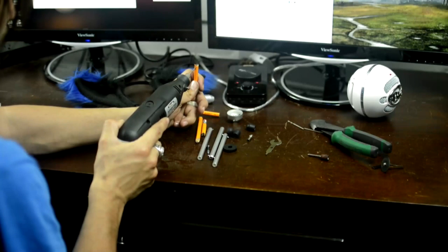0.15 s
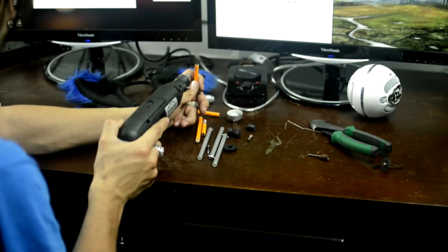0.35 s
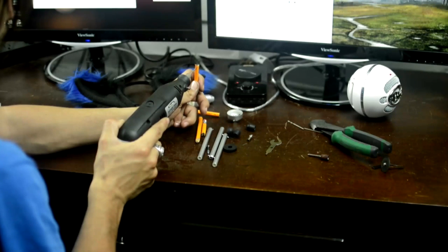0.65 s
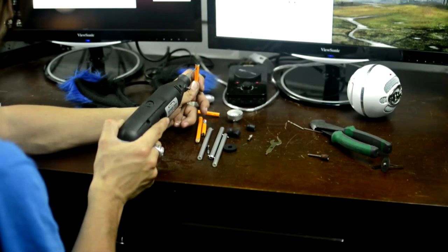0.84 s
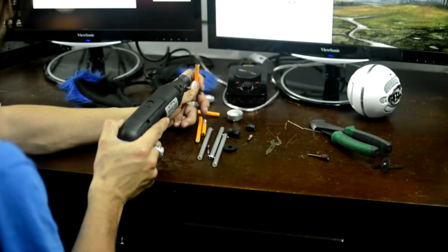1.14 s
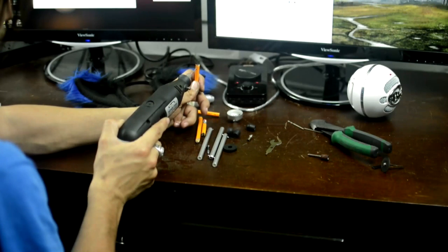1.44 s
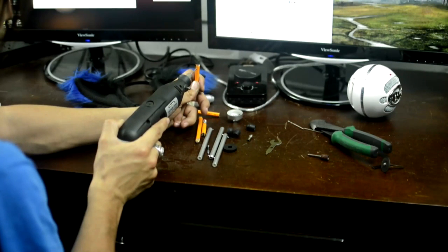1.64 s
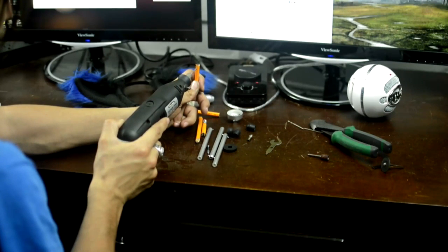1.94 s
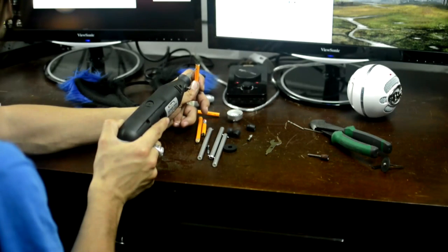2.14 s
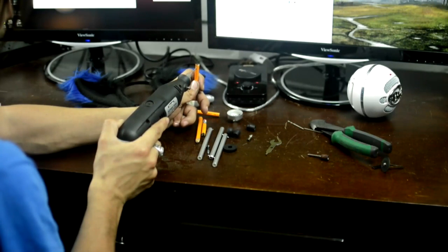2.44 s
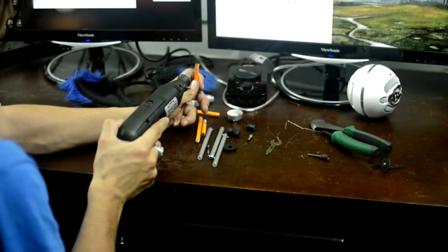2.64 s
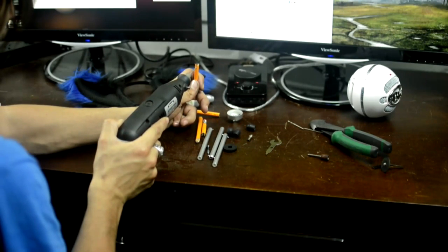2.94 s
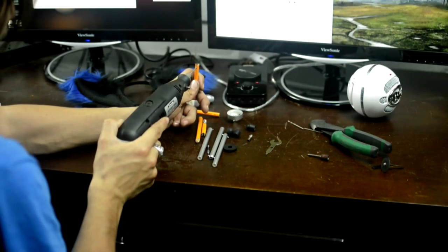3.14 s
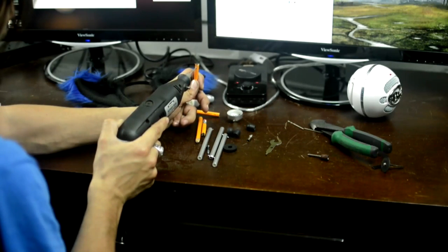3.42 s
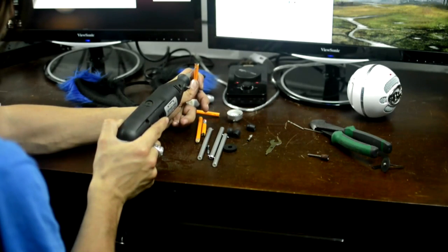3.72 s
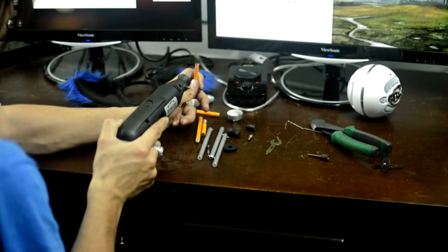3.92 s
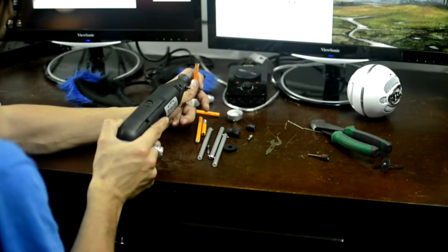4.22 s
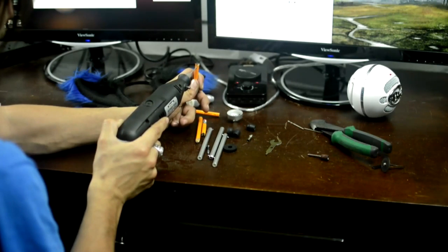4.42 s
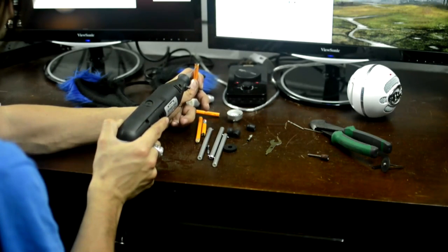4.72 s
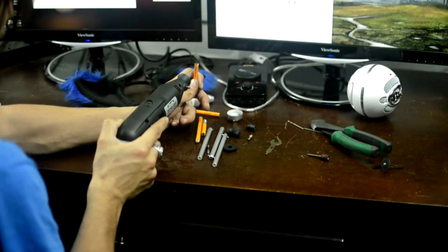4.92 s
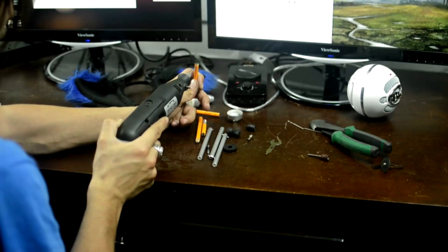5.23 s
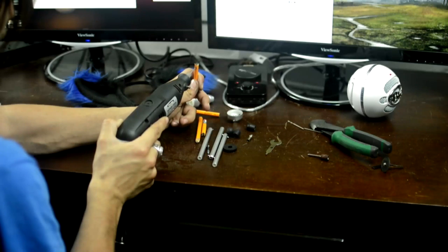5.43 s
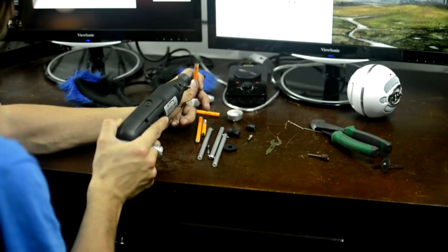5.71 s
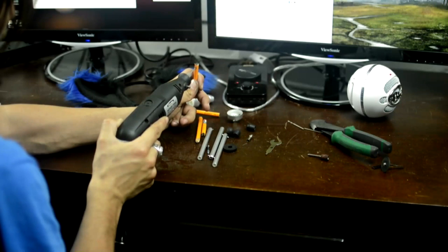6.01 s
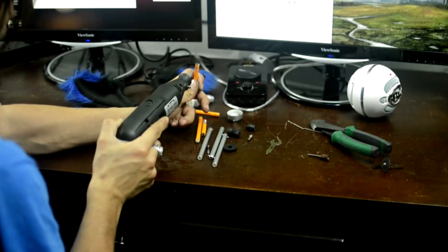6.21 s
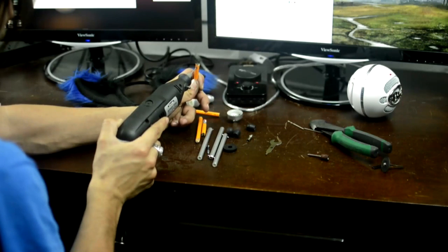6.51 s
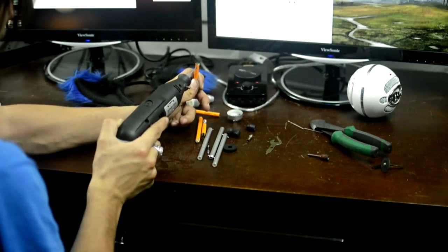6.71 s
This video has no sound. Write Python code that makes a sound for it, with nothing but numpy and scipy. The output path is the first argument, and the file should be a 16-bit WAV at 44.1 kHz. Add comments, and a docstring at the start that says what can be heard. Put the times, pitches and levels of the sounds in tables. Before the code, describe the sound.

A small electric rotary tool winds up to a buzzy whine and drills wood, its pitch slowly sagging amid hiss, rasp and brief squeals.

```python
"""At a desk in a quiet room, two close microphones hear a small rotary tool drill hand-held wood.
The motor winds up and whines on multiples of its shaft speed, which sags under load.
Each leading tone swells or fades as it glides through standing waves; brushes and fan hiss in the housing.
The bit rasps twice a turn, sings briefly on single overtones and chatters where it grabs."""
import sys
import numpy as np
from scipy import signal
from scipy.fft import rfft, irfft
from scipy.io import wavfile
from scipy.ndimage import uniform_filter1d

SR = 44100
rng = np.random.default_rng(int(sys.argv[2]) if len(sys.argv) > 2 else 0)


def store_wav(level_fs):
    """Save 16-bit WAV to argv[1]."""
    pcm = np.round(np.clip(np.atleast_2d(level_fs), -1, 1) * 32767)
    wavfile.write(sys.argv[1], SR, pcm.T.astype(np.int16))


N = 302526
TIME = np.arange(N) / SR
FREQS = np.fft.rfftfreq(N, 1 / SR)


def amp(db):
    """Decibels to gain."""
    return 10 ** (np.asarray(db) / 20)


def unit(x):
    """Scales to rms 1."""
    return x / np.sqrt(np.mean(x ** 2) + 1e-20)


def curve(rows):
    """Joins (time, value) rows by straight lines."""
    return np.interp(TIME, *np.transpose(rows))


def read(points, hz):
    """Reads (frequency, value) points on a log-frequency axis."""
    f, value = np.transpose(points)
    return np.interp(np.log(hz + 1), np.log(f + 1), value)


def colour(x, db):
    """Filters by a dB value for every frequency; rms 1."""
    return unit(irfft(rfft(x) * amp(db), N))


def wander(rate_hz):
    """Slow random drift of rms 1: noise that rolls off above rate_hz."""
    t = np.linspace(0, N / SR, 8192)
    rolloff = 1 + (np.fft.rfftfreq(len(t), t[1]) / rate_hz) ** 4
    slow = irfft(rfft(rng.standard_normal(len(t))) / rolloff)
    return np.interp(TIME, t, unit(slow))


def swell(start_s, length_s):
    """A bell-shaped rise and fall centred on start_s, length_s wide at half height."""
    return .5 ** ((2 * (TIME - start_s) / length_s) ** 2)


def sine(turns):
    """A sine of rms 1 with a random starting phase."""
    return np.sqrt(2) * np.sin(2 * np.pi * (turns + rng.random()))


def strokes(turns, sharpness):
    """One smooth peak in every turn; rms 1."""
    return unit(np.exp(sharpness * np.cos(2 * np.pi * turns)))


def resonance_db(modes, hz):
    """The gain that a set of resonances adds at these frequencies."""
    return sum(db / (1 + (2 * (hz - centre) / width) ** 2) for centre, width, db in modes)


# colour of the quiet room: (frequency [Hz], relative level [dB])
ROOM_COLOUR = [(20, -16), (50, -1.5), (100, -0.5), (190, 2), (320, -9), (600, -16), (3000, -53)]


def room(level_db=-69, hum_db=-68.5, swell_db=2.6, swell_period_s=2.45, first_swell_s=0.29, waver_db=1.5):
    """Low room noise and a mains hum that slowly swells and wavers."""
    slow_db = swell_db * np.cos(2 * np.pi * (TIME - first_swell_s) / swell_period_s)
    hum = sine(120 * TIME) * amp(hum_db + slow_db + waver_db * wander(4))
    noise = colour(rng.standard_normal(N), read(ROOM_COLOUR, FREQS))
    return amp(level_db) * noise + hum


def walls(x, level_db=-13, t60_s=0.19, above_hz=1900):
    """Adds the room's diffuse treble tail, against which the high tones fade in and out."""
    tail = rng.standard_normal(N) * amp(-60 * np.minimum(TIME / t60_s, 2))
    treble = FREQS ** 8 / (FREQS ** 8 + above_hz ** 8)
    response = rfft(tail / np.linalg.norm(tail)) * treble
    return irfft(rfft(x) * (1 + amp(level_db) * response), N)


# standing waves between tool, desk and walls; nodes have negative gain:
# (frequency [Hz], width [Hz], gain [dB])
STANDING_WAVES = [(255.5, 14.4, 12), (275.7, 15.5, 13), (534.5, 12.5, 9.5), (541.5, 3.6, -4),
                  (548, 4.8, 6.0), (555, 7, -3.5), (575.9, 22, 16), (813.2, 28.5, 12.5), (862, 13.4, 9),
                  (1063, 6.6, 8), (1085, 10, 5), (1116, 6.0, 7), (1151.6, 35, 13.3), (1627, 32.6, 8.3),
                  (1667, 12, 13), (1706, 7.1, -7.5), (1727, 33, 13.0), (2153, 20, 7.5), (2175, 12, 9.5),
                  (2212.4, 18, 10.5), (2277, 58, 8.5), (4240, 22, 7), (4381, 100, 9), (4556, 32, 8),
                  (4628.8, 29, 9.5), (9779.3, 34, 4.4), (9892.5, 43, -1.5), (10360, 49.9, -3)]


def standing_wave_db(hz):
    """How far a tone is lifted or swallowed as it glides through the standing waves."""
    return resonance_db(STANDING_WAVES, hz)


# resonances of the plastic housing: (frequency [Hz], width [Hz], gain [dB])
HOUSING = [(663, 19, 8.5), (834, 75, 2.5), (988, 36, 6), (1354, 53, 5.5), (1496, 29, 8), (1666, 105, 3),
           (2000, 76, 2.5), (2160, 16, 4), (2340, 26, 3.5), (2440, 36, 6), (2820, 64, 3)]


def housing_db():
    """The gain that the shell's resonances add."""
    return resonance_db(HOUSING, FREQS)


# shaft speed: (time [s], speed [turns/s])
SHAFT_SPEED = [(0.0, 247.2), (0.17, 259.7), (0.44, 272.5), (0.77, 282.0), (1.04, 286.4), (1.25, 288.3),
               (1.48, 289.7), (2.01, 289.5), (2.94, 286.0), (3.47, 283.2), (4.15, 278.2), (4.33, 275.3),
               (4.91, 274.2), (5.25, 271.7), (5.92, 268.7), (6.49, 265.7), (6.78, 270.2), (6.85, 270.4)]


def shaft_speed():
    """The motor winds up, sags under load and wavers slightly."""
    return curve(SHAFT_SPEED) * (1 + 0.00043 * wander(17.8))


# how hard the bit cuts, before the grabs and the rasp's own trim: (time [s], level [dB])
CUT = [(0.0, -50.5), (0.57, -47.5), (1.11, -42.5), (1.78, -41.5), (2.86, -43.5), (3.2, -41), (3.42, -44),
       (3.57, -43), (3.92, -42.5), (4.32, -44.5), (4.93, -43.5), (5.39, -44.5), (6.85, -46)]


def cutting(grab_db=3):
    """How hard the bit cuts, in dB: the hand's feed, and a little more at each grab."""
    return curve(CUT) + grab_db * sum(swell(s, length) for s, length, _ in GRABS)


# colour of fan and brushes, before housing and ripple: (frequency [Hz], relative level [dB])
AIR_COLOUR = [(100, -21.5), (330, -16), (480, -13), (800, -7), (1300, -2.5), (2400, 2), (3400, -1.5),
              (5500, -4.5), (8000, -6.5), (10300, -7), (11400, -11.5), (12300, -10), (13200, -8),
              (15000, -17.5)]


def air(turns, speed, level_db=-39.5, speed_power=2.8, ripple_db=3.0):
    """Fan and brush hiss rises with speed and rings the housing; nearby echoes ripple its colour."""
    hiss = rng.standard_normal(N) * strokes(2 * turns, sharpness=0.11)
    ripple = unit(uniform_filter1d(rng.standard_normal(len(FREQS)), size=400))
    colour_db = read(AIR_COLOUR, FREQS) + housing_db() + ripple_db * ripple * (FREQS > 2800)
    return amp(level_db) * (speed / speed.max()) ** speed_power * colour(hiss, colour_db)


def rattle(turns, speed, level_db=-48.5, centre_hz=2300, width_hz=450, speed_power=3):
    """The bearing knocks unevenly with each turn of its cage, in a band of the shell's resonances."""
    cage_turns = turns * 3 / 7
    knocks = rng.standard_normal(N) * strokes(cage_turns, sharpness=0.48) * amp(2.4 * wander(15))
    band_db = -20 * np.log10(1 + (2 * (FREQS - centre_hz) / width_hz) ** 2)
    ringing = colour(knocks, band_db + 0.36 * housing_db())
    return amp(level_db) * (speed / speed.max()) ** speed_power * ringing


# colour of the cutting rasp, before the housing: (frequency [Hz], relative level [dB])
RASP_COLOUR = [(100, -34), (450, -18), (900, -11), (1600, -6.5), (2800, 2), (3500, -4), (5000, 4),
               (7000, 0), (9500, -12.5), (11500, -15), (15000, -15)]


def rasp(turns, cut_db, level_db=-3.0):
    """Each of the two flutes scrapes off a chip once a turn."""
    chips = rng.standard_normal(N) * strokes(2 * turns, sharpness=0.24)
    chips *= strokes(4 * turns, sharpness=.3)
    chips *= amp(0.34 * wander(100))  # slight random unevenness, in dB
    return amp(cut_db + level_db) * colour(chips, read(RASP_COLOUR, FREQS) + .5 * housing_db())


# the bit sings, before a common trim:
# (time [s], length [s], multiple of the shaft speed, rms level [dB])
SQUEALS = [(0.72, .06, 16, -43), (0.738, 0.072, 10, -43.5), (1.194, 0.08, 20, -49), (1.264, .13, 10, -45),
           (1.65, 0.2, 20, -47.5), (2.318, 0.061, 10, -43), (2.906, 0.048, 14, -42), (2.94, .05, 26, -44),
           (3.02, .04, 30, -42), (3.18, 0.07, 26, -43), (3.363, 0.18, 12, -41), (3.46, .025, 24, -40.5),
           (3.52, 0.095, 18, -51), (3.68, 0.28, 14, -40.5), (3.8, 0.063, 20, -42), (4.053, 0.12, 10, -46.5),
           (4.46, .25, 24, -48), (4.669, 0.087, 12, -42), (4.715, 0.095, 14, -40), (4.728, .06, 22, -37.5),
           (4.798, 0.093, 22, -42), (4.733, .14, 20, -42), (5.084, 0.26, 20, -42), (5.402, 0.29, 14, -46)]


def squeals(turns, level_db=-1, rough=0.17):
    """The bit locks on to one overtone for a moment."""
    tones = sum(amp(db) * swell(s, length) * sine(order * turns) for s, length, order, db in SQUEALS)
    return amp(level_db) * tones * (1 + rough * wander(64))


# the bit grabs, level before the chatter's own modulation: (time [s], length [s], level [dB])
GRABS = [(3.003, 0.055, -40), (3.474, .05, -46), (3.655, 0.24, -54), (4.657, 0.065, -35),
         (6.844, 0.064, -34)]
# colour of the chatter: (frequency [Hz], relative level [dB])
CHATTER_COLOUR = [(400, -50), (1200, -20), (2200, -42), (3700, 5.5), (5000, -2.5), (6600, 2.5), (8800, 2.5),
                  (10500, -8), (15000, -21)]


def chatter(turns, slip=.012, noisy=0.79):
    """The grabbing bit hammers the hole twice a turn; the overtones of its blows flare at random."""
    blows = 2 * turns + slip * wander(83)
    ring = sum((.6 + wander(30)) * sine(k * blows) for k in range(3, 22))
    scrape = rng.standard_normal(N) * strokes(blows, sharpness=.4)
    grabs = sum(amp(db) * swell(s, length) for s, length, db in GRABS)
    return grabs * colour(unit(ring) + noisy * np.sqrt(2) * scrape, read(CHATTER_COLOUR, FREQS))


# the weaker even overtones: (frequency [Hz], level re the cut [dB])
EVEN = [(2700, -9.5), (3400, -10), (4000, -11), (5100, -11.5), (5700, -11), (6300, -13), (7200, -11.5),
        (7900, -29.5), (8700, -14.5), (10700, -17.5), (11500, -24), (14500, -38)]
# odd overtones from the shaft's runout: (frequency [Hz], level re the cut [dB])
ODD = [(1400, -23.5), (2000, -14), (3100, -11), (5400, -24.5), (7500, -28), (14000, -47)]


def buzz(turns, speed, cut_db, drift=0.53, rough=0.38, cage_depth=0.27, bite=0.12):
    """The other overtones grow with the cut, faster than the rasp; each drifts, and the bearing cage shakes them."""
    out, cage_turns = np.zeros(N), turns * 3 / 7
    for order in range(1, 54):
        if order in TONES or order == WHISTLE_ORDER:
            continue
        # levels are read on every 64th sample and held
        level_db = read(ODD if order % 2 else EVEN, order * speed[::64])
        level = np.repeat(amp(level_db), 64)[:N]
        size = 1 + drift * wander(5.2) + rough * wander(22.5) + cage_depth * sine(cage_turns)
        out += level * unit(size) * sine(order * turns)
    return out * amp(cut_db + bite * (cut_db - np.median(cut_db)))


WHISTLE_ORDER = 36  # multiple of the shaft speed
# nearby surfaces echo the whistle: (delay [ms], gain [ratio])
WHISTLE_ECHOES = [(8.49, .62), (13.095, .33)]


def whistle(turns, speed, level_db=-46.5, speed_power=6, flutter=0.13):
    """The commutator's tone beats against its own echoes: fast while the speed glides, slowly while it holds."""
    level = amp(level_db + standing_wave_db(WHISTLE_ORDER * speed)) * (speed / speed.max()) ** speed_power
    tone = level * (1 + flutter * wander(31)) * sine(WHISTLE_ORDER * turns)
    echoes = sum(gain * np.exp(-2j * np.pi * FREQS * ms / 1000) for ms, gain in WHISTLE_ECHOES)
    return irfft(rfft(tone) * (1 + echoes), N)


# leading tones, before standing waves and flutter:
# multiple of the shaft speed -> (level at the usual cut [dB], gain per dB of cut [dB])
TONES = {1: (-80, -0.47), 2: (-52.5, -0.19), 3: (-63.5, 1.0), 4: (-57.5, 0.72), 6: (-53.2, 1.1),
         8: (-53, .2), 16: (-54.5, .2)}
# the bit rubs the side of its hole and the sixth overtone howls: (time [s], length [s], gain [dB])
HOWLS = [(1.21, 0.096, 4.5), (1.468, 0.16, 12.5), (1.69, 0.14, 9), (1.95, .08, 3), (2.387, 0.088, 5),
         (2.93, .08, 3), (3.15, .12, 3), (3.6, 0.1, 2), (4.06, .16, 4), (4.22, .08, 4)]
# the bit skips in its hole, and the sixth overtone breaks off and restarts: (time [s])
SKIPS = [1.095, 1.21, 1.395, 1.46, 1.525, 1.885, 2.005, 2.16]


def whine(turns, speed, cut_db, flutter=0.062, phase_drift=0.0074, skip_s=0.016):
    """Leading motor tones follow the cut and the standing waves they pass; the higher ones flutter more."""
    out, load_db = np.zeros(N), cut_db - np.median(cut_db)
    for order, (db, gain_with_load) in TONES.items():
        level_db = db + gain_with_load * load_db + standing_wave_db(order * speed)
        shake = 1 + flutter * np.log2(order) ** 2 / 4 * wander(23) + 0.054 * wander(16)
        if order == 6:
            level_db += sum(howl_db * swell(s, length) for s, length, howl_db in HOWLS)
            # each skip passes through silence and returns with the sign flipped
            shake *= np.prod([np.tanh((TIME - s) / skip_s) for s in SKIPS], axis=0)
        out += amp(level_db) * shake * sine(order * turns + phase_drift * wander(5.2))
    return out


def main_spread(speed, node_db=-1, narrowing=1.18):
    """Side re mid of the main tone: the microphones agree on a standing wave's crest, less so near a node."""
    return amp(node_db - narrowing * standing_wave_db(2 * speed))


# what differs between the microphones, outside the main tone: (frequency [Hz], side re mid [dB])
WIDTH_DB = [(60, -15), (120, -12.5), (270, -16.5), (560, -20.5), (1200, -23.5), (2400, -15.5),
            (4400, -21.5), (8000, -13.5), (14000, -15)]
# balance of the two microphones: (frequency [Hz], left minus right [dB])
BALANCE_DB = [(60, 4), (120, 4), (270, -0.3), (560, -2), (1200, 0), (2400, 0.5), (5000, -0.5), (8000, 0.7),
              (13000, 2)]


def microphones(tones, noise, echo, spread, scatter=0.223, lag_rad=0.41):
    """Two close microphones: tones differ in phase, most in the treble; the noise's echoes are unrelated."""
    steps = rng.standard_normal(len(FREQS)) * np.minimum(FREQS / 8000, 1) ** 2
    shift = np.exp(1j * (np.pi / 2 + scatter * np.cumsum(steps)))
    # the band of the main tone, at twice the shaft speed, has its own place between the microphones
    main = 1 / (1 + ((FREQS - 540) / 90) ** 8)
    main_tone = irfft(main * rfft(tones), N)
    main_side = rfft(main_tone * spread) * np.exp(-1j * lag_rad)
    tone_side = shift * (1 - main) * rfft(tones)
    side = main_side + amp(read(WIDTH_DB, FREQS)) * (tone_side + rfft(echo))
    mid, lean = rfft(tones + noise), amp(read(BALANCE_DB, FREQS) / 2)
    return irfft(np.array([(mid + side) * lean, (mid - side) / lean]), N)


def scene():
    """One shaft drives every part of the tool."""
    speed = shaft_speed()
    turns, cut_db = np.cumsum(speed) / SR, cutting()

    def noises():
        """Room, hiss, bearing and rasp, drawn afresh at each call."""
        return room() + air(turns, speed) + rattle(turns, speed) + rasp(turns, cut_db)

    # the diffuse echo has the colour and level of the direct noise, but other fine detail
    noise, echo = noises(), noises()
    tones = walls(whine(turns, speed, cut_db) + whistle(turns, speed))
    tones += buzz(turns, speed, cut_db) + squeals(turns) + chatter(turns)
    return microphones(tones, noise, echo, main_spread(speed))


def record(dry, edge_hz=15050):
    """The recorder's band limit: a steep low-pass at edge_hz."""
    low_pass = signal.firwin(511, edge_hz, window=("kaiser", 9), fs=SR)
    return signal.oaconvolve(dry, low_pass[None], "same")


dry = scene()
out = record(dry)
store_wav(out)
```